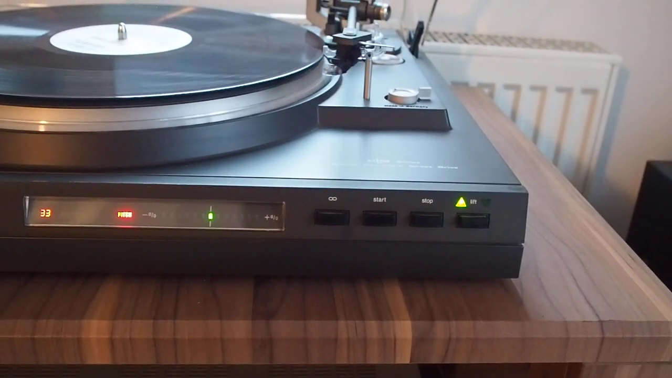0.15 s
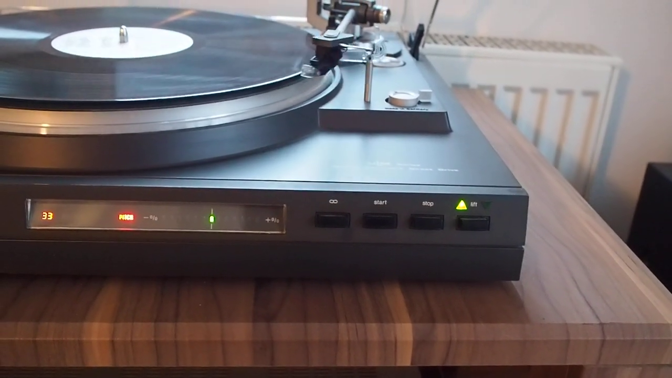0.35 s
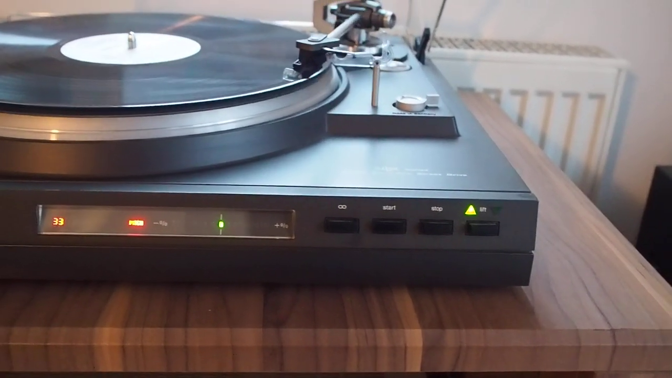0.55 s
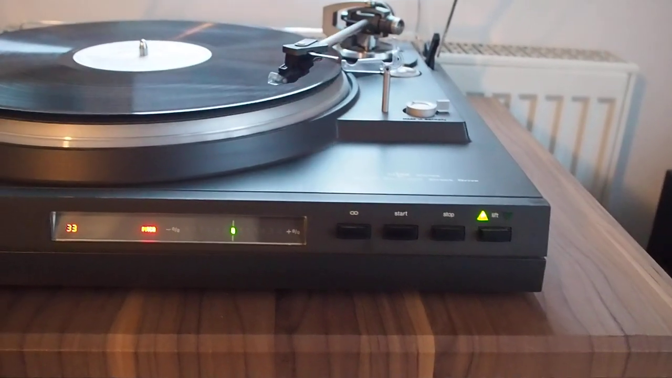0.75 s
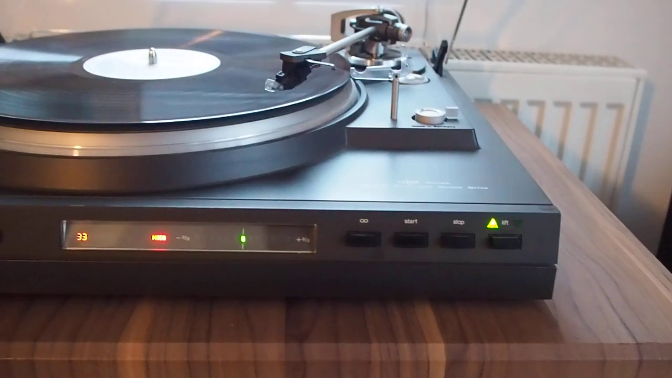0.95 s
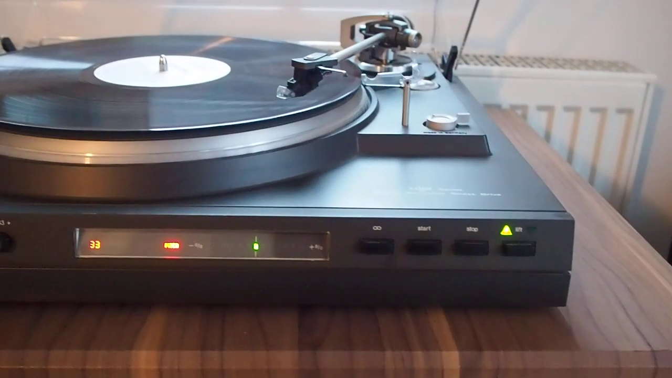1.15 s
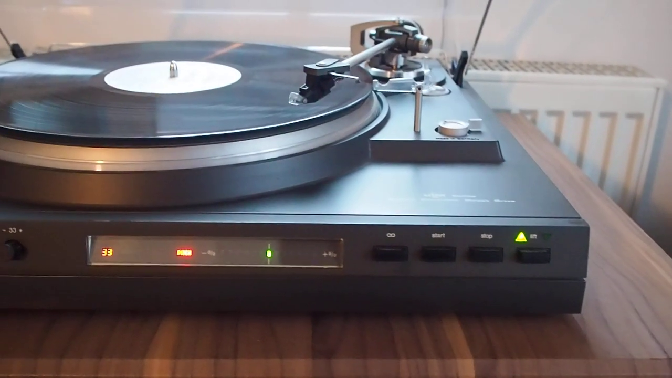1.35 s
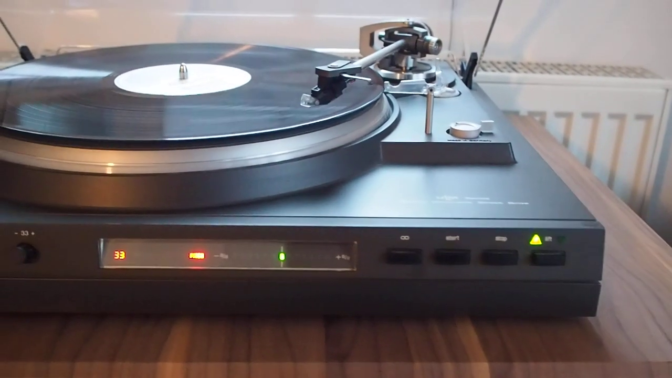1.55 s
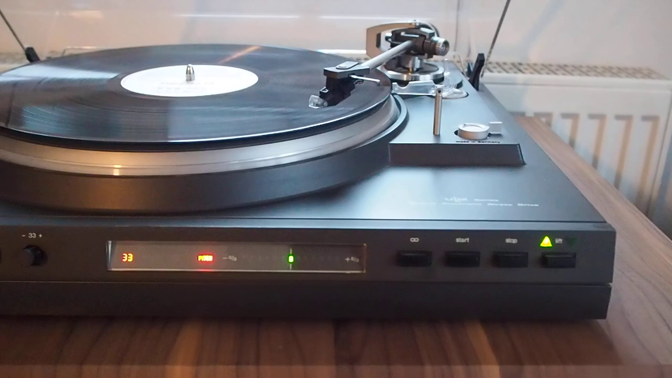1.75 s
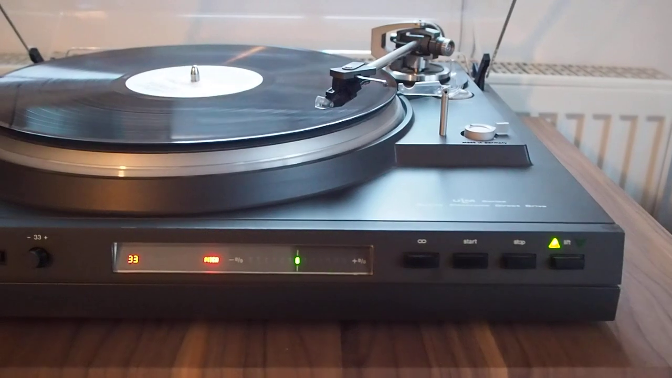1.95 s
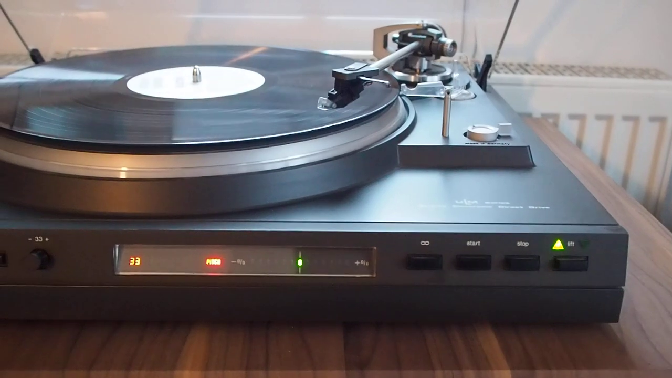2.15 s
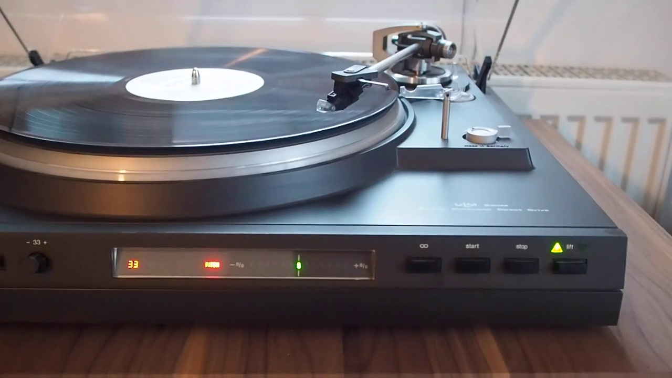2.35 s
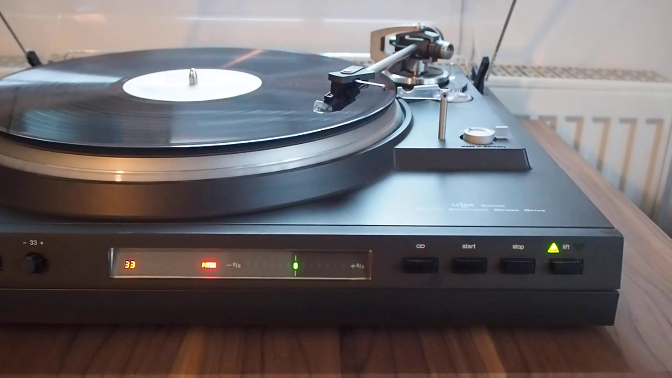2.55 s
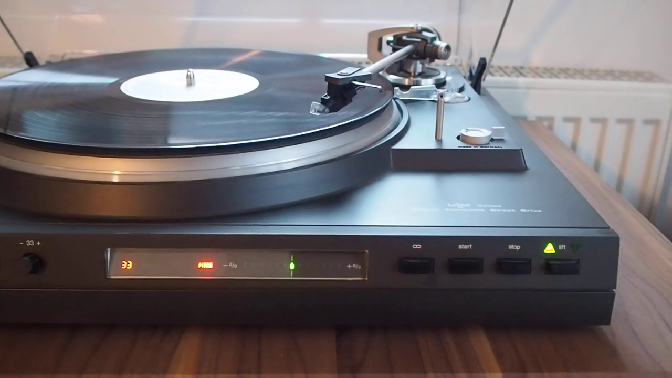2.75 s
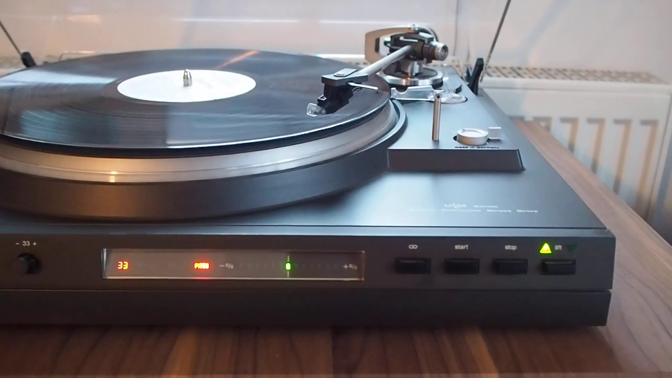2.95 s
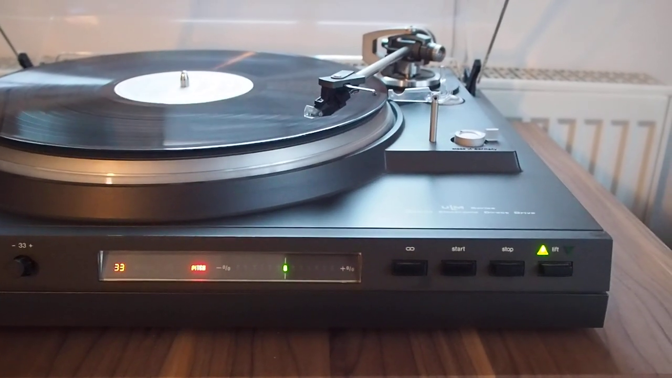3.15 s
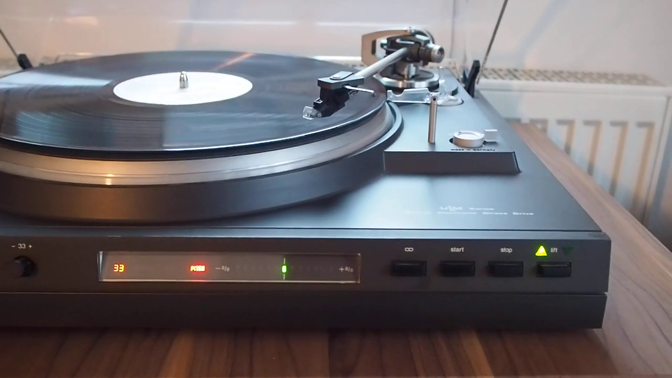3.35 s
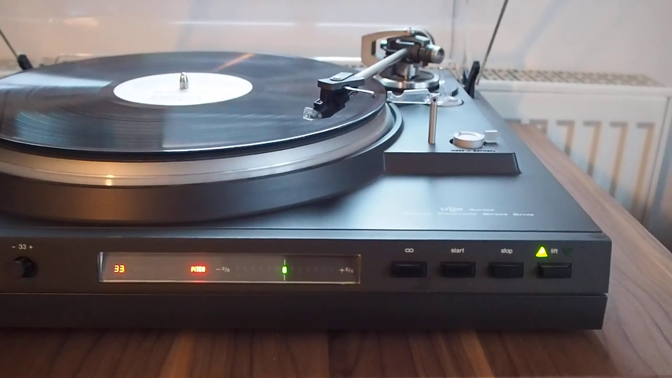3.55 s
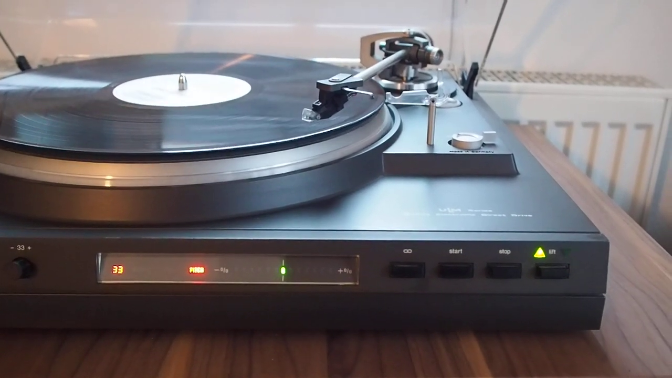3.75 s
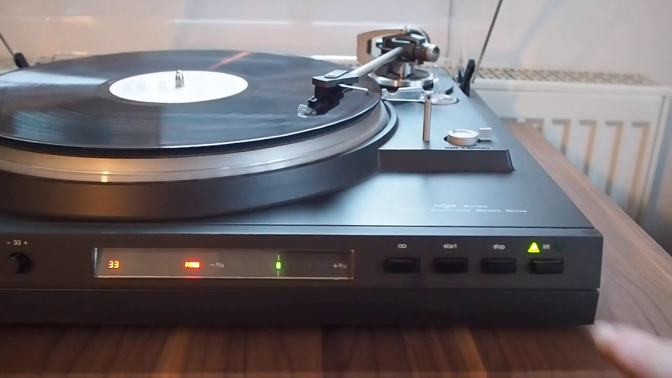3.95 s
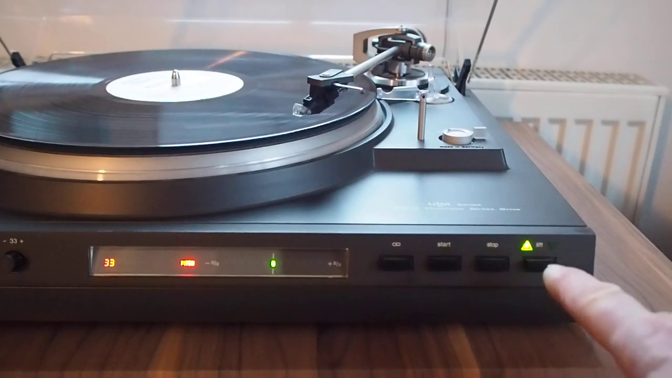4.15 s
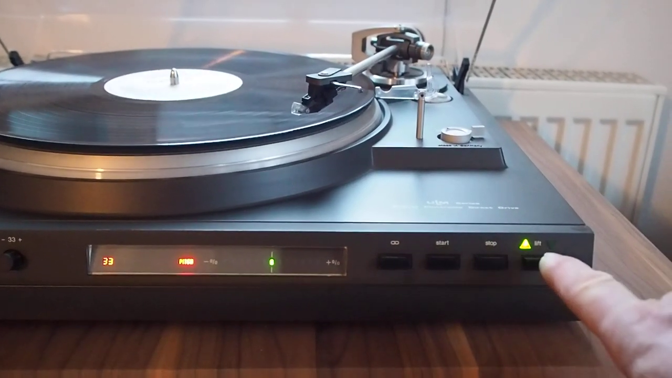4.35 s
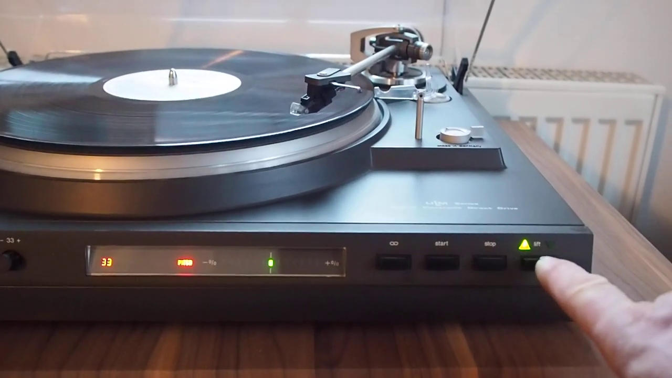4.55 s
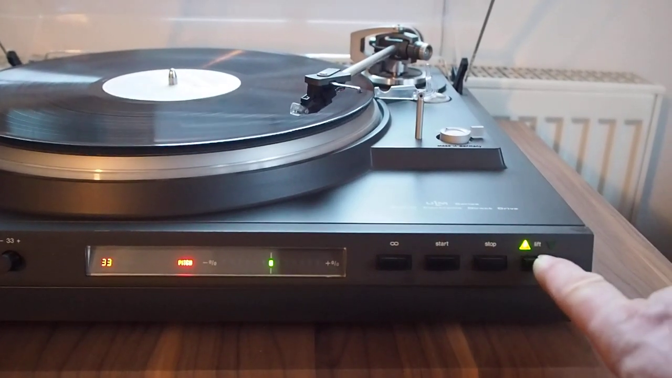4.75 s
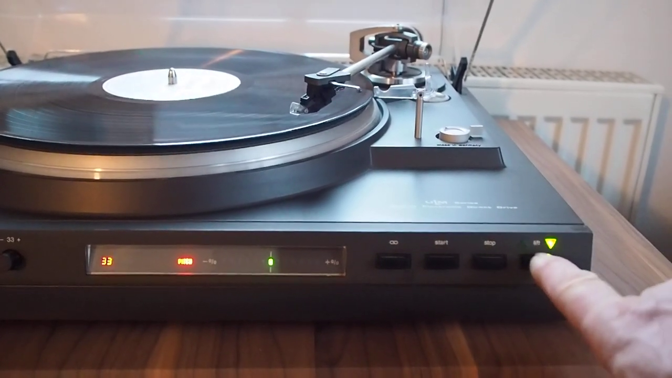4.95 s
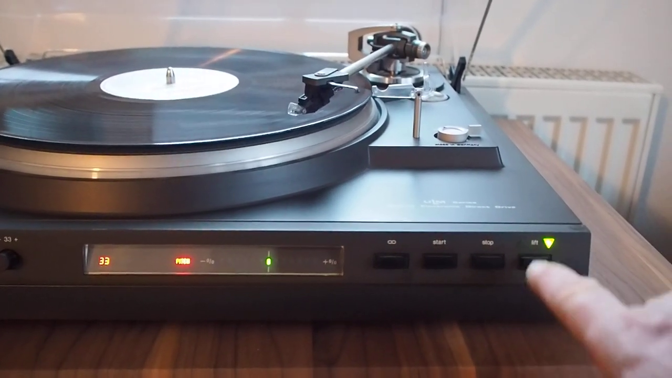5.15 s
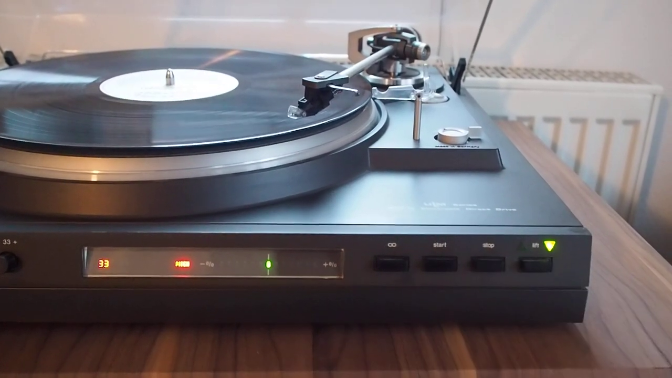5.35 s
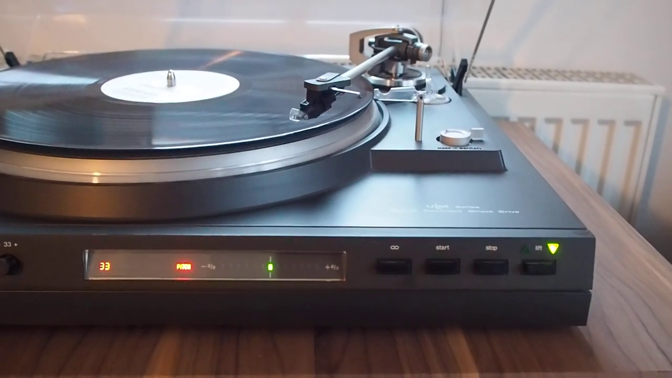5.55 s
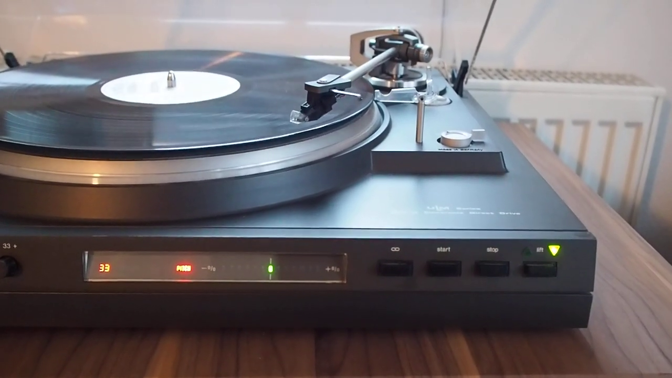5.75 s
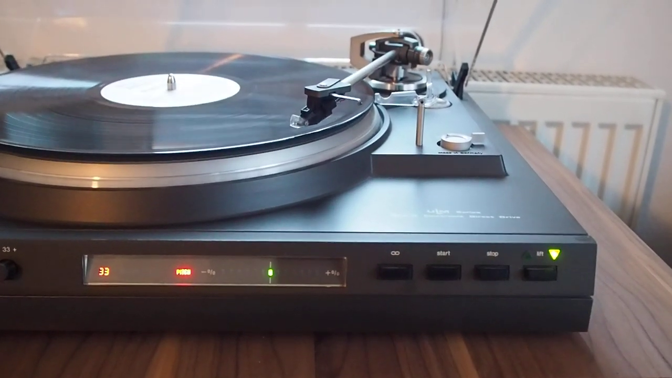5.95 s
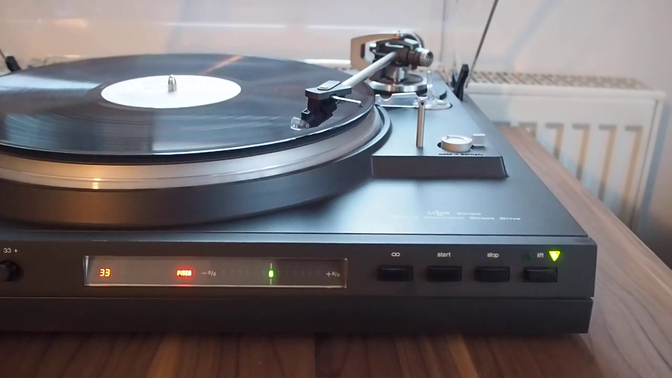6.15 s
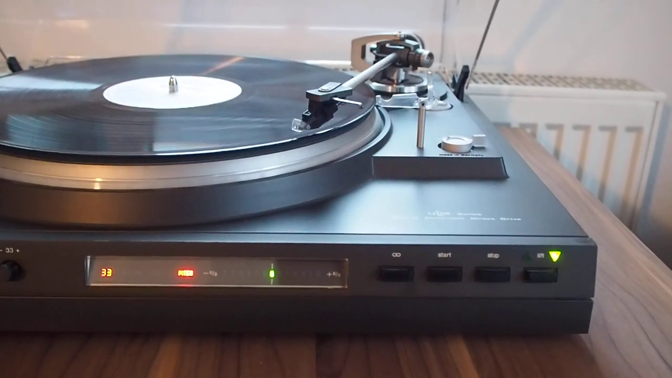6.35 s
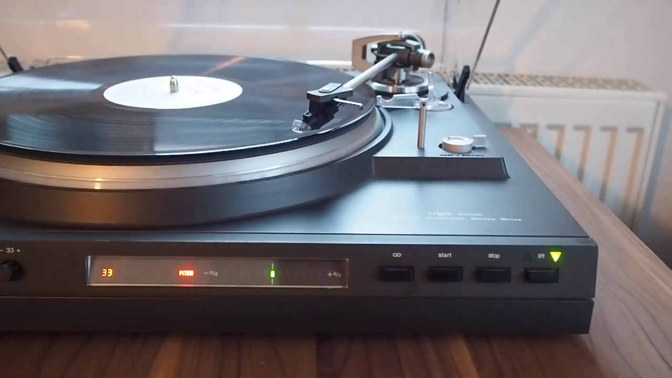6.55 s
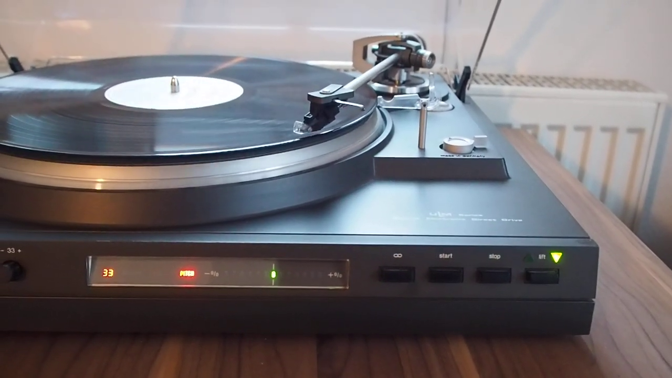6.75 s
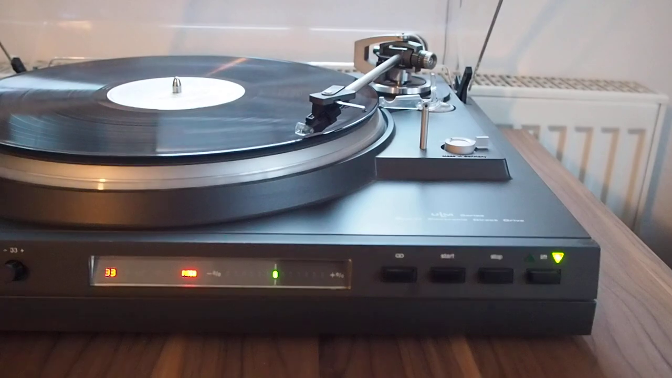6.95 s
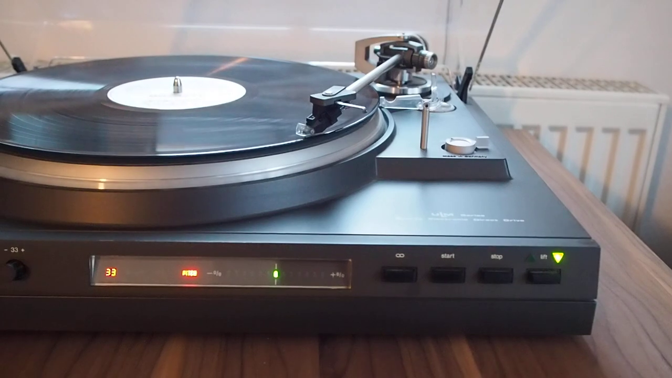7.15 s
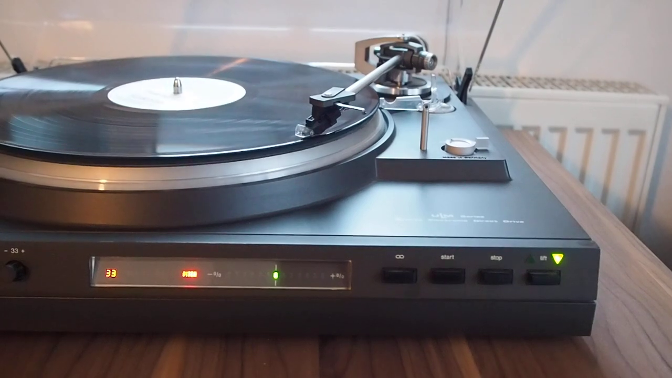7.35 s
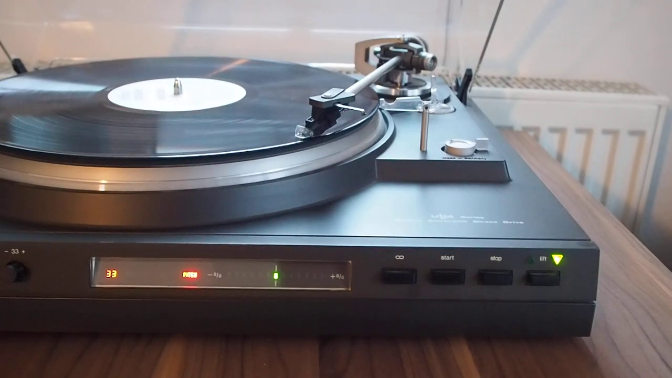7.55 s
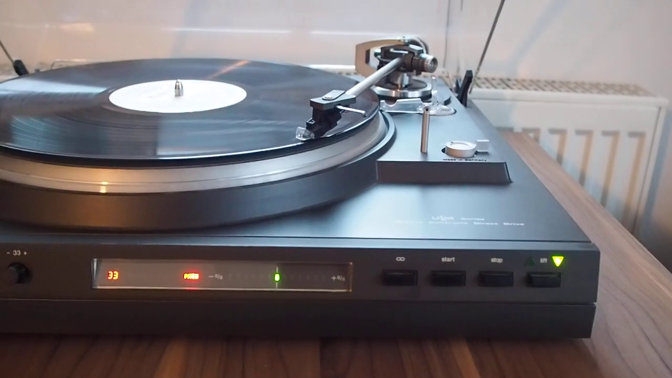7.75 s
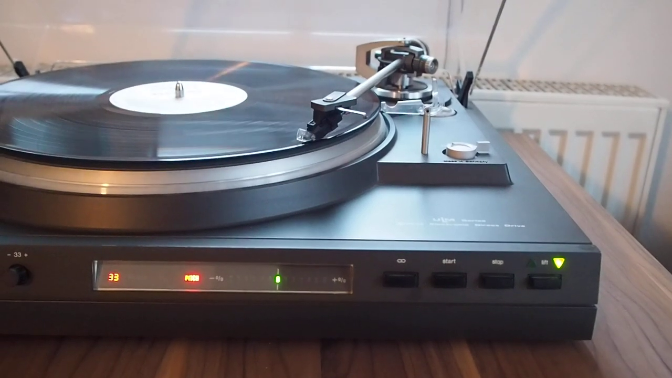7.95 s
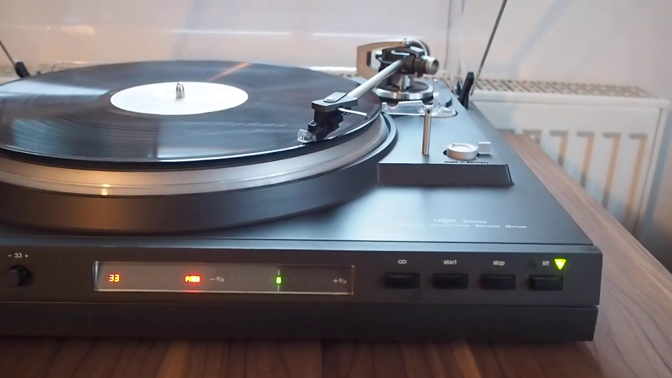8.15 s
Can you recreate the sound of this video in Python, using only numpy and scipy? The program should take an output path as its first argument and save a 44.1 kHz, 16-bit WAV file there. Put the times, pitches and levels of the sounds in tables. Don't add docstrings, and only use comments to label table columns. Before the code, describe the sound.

In a quiet room, a record player's arm mechanism snaps and clatters, a button clicks down and up, then the stylus lands with a thump.

```python
import sys
import numpy as np
from scipy import signal
from scipy.fft import rfft, irfft, next_fast_len
from scipy.io import wavfile
from scipy.ndimage import uniform_filter1d

SR = 44100
rng = np.random.default_rng(int(sys.argv[2]) if len(sys.argv) > 2 else 0)


def store_pcm(level_fs):
    pcm = np.round(np.clip(level_fs, -1, 1) * 32767).astype(np.int16)
    wavfile.write(sys.argv[1], SR, np.atleast_2d(pcm).T)


def rack_gain(trim_db):
    fader = np.asarray(trim_db, float)
    return 10 ** (fader / 20)


N = 361459
BASS_HZ, EDGE_HZ = 52.6, 15750
PLINTH_HZ = (180, 1500)
SHARP_HZ, CRISP_HZ, BLUNT_HZ = 14300, 12000, 6000
SIDEWAYS = 3.5


def evened(x):
    return x / np.sqrt(np.mean(x ** 2) + 1e-20)


def topped(x):
    return x / (np.max(abs(x)) + 1e-20)


def read(points, hz):
    f, value = np.transpose(points)
    return np.interp(np.log(hz + 1), np.log(f + 1), value)


def add(mix, s, sound):
    part = mix[..., round(s * SR):][..., :sound.shape[-1]]
    part += sound[..., :part.shape[-1]]


def sides(pan_db):
    return rack_gain(np.array([[.5], [-.5]]) * pan_db)


def chatter(lasts, rise):
    t = np.arange(4096) / SR
    shape = (1 - np.exp(-t / rise)) ** 2 * np.exp(-(t / (1.64 * lasts)) ** 1.225)
    uneven = rack_gain(2.65 * rng.exponential(1, 4096).clip(0, 4))
    blows = shape * rng.standard_normal(4096) * uneven
    for _ in range(2):
        z = rfft(blows)
        flat = irfft(z / (abs(z) + 1e-12)) * np.linalg.norm(shape)
        blows = np.clip(flat, -5 * shape, 5 * shape)
    return blows


def ring(body, crack_db, spread_db):
    t = np.arange(4096) / SR
    hz, width, db = np.transpose(body)[:, :, None]
    luck = rng.standard_normal((3, len(body), 1))
    db = db + spread_db * (luck[:1] + 0.83 * luck[1:])
    apart = np.array([[[.35]], [[-.35]]]) * (1 + 0.43 * luck[:1])
    phase = np.minimum(hz / 9000, 1) * np.pi * apart
    decay = 2 * np.pi * width / SR * np.exp(-np.pi * width * t)
    modes = rack_gain(db) * decay * np.sin(2 * np.pi * hz * t + phase)
    out = modes[:, ::2].sum(1) - modes[:, 1::2].sum(1)
    out[:, 0] += rack_gain(crack_db)
    return out


def band(x, hz):
    return signal.sosfilt(signal.butter(2, hz, "bandpass", fs=SR, output="sos"), x)


def click(row, body, plinth, crack_db, pan_db, top_hz, blur):
    s, db, plinth_db, ms, rise_ms = row
    lasts, rise = max(ms, .3) / 1000, max(rise_ms, .1) / 1000
    part_ring = ring(np.multiply(body, [1, blur, 1]), crack_db, spread_db=3.5)
    part = signal.fftconvolve(part_ring, chatter(lasts, rise)[None], axes=1)
    low_ring = ring(np.multiply(plinth, [1, np.sqrt(blur), 1]), -41.0, spread_db=1.05)
    low = signal.fftconvolve(low_ring, chatter(1.24 * lasts, rise)[None], axes=1)
    low = band(low, PLINTH_HZ)
    part = band(part, (PLINTH_HZ[1], top_hz))
    return s, sides(pan_db) * rack_gain(db) * (rack_gain(plinth_db) * topped(low) + topped(part))


def clicks(blur, *parts):
    out = np.zeros((2, N))
    for rows, *part in parts:
        for row in rows:
            add(out, *click(row, *part, blur))
    return out


# start_s, level_db, plinth_re_level_db, chatter_ms, rise_ms
LEVER_CLICKS = [
    (2.168, -45, 11.5, 2.2, .5),
    (2.255, -42, 3.5, 2.3, 0.62),
    (2.592, -48, 11, 2.5, .5),
    (2.972, -47.5, 8, 14, 0.5),
]
LATCH_CLICKS = [
    (2.6112, -5, -17, 2.86, 2.9),
]
TICK_CLICKS = [
    (.897, -42.5, -21, 2.9, 0.93),
    (.918, -42.5, -11, 2.6, .66),
]
PAWL_CLICKS = [
    (2.717, -21.5, -23, 2.2, 0.88),
]
CAM_CLICKS = [
    (2.945, -21.5, -16.5, 3.7, 0.78),
]
# pitch_hz, width_hz, level_db
LEVER_MODES = [(1920, 340, 2.5), (2880, 380, -6), (4230, 400, -6), (7500, 800, -10)]
LATCH_MODES = [(2210, 160, -27), (3370, 190, -30), (4200, 150, 4.5), (4870, 210, -7.5), (6770, 350, -8.5),
               (8500, 200, -10), (9650, 230, -8), (12250, 650, 0.5), (13200, 260, -2.5), (14200, 300, -14)]
PAWL_MODES = [(1960, 91, 8), (3030, 43, 3.5), (4650, 67, 10.2), (6470, 580, 3), (9300, 300, 7),
              (11500, 600, -5)]
CAM_MODES = [(1930, 120, -6), (3110, 77, 4.5), (4660, 570, -1.5), (8760, 320, -2), (12500, 250, 4.5)]
ARM_PLINTH = [(250, 24, 0), (410, 53, -11), (516, 57, -1.5), (716, 103, -0.5), (1000, 22, 8.5),
              (1147, 58, 0.5)]


def arm_linkage(blur):
    return clicks(blur, (LEVER_CLICKS, LEVER_MODES, ARM_PLINTH, -14, 2.2, BLUNT_HZ),
                  (LATCH_CLICKS, LATCH_MODES, ARM_PLINTH, -14, 2.5, SHARP_HZ),
                  (TICK_CLICKS, SWITCH_MODES, ARM_PLINTH, -8, 1.5, CRISP_HZ),
                  (PAWL_CLICKS, PAWL_MODES, ARM_PLINTH, -10, 1.5, CRISP_HZ),
                  (CAM_CLICKS, CAM_MODES, ARM_PLINTH, -12, 1.5, CRISP_HZ))


# start_s, level_db, plinth_re_level_db, chatter_ms, rise_ms
STOP_CLICKS = [
    (3.015, -23, -6.5, 5.1, 1.14),
    (3.282, -32.5, -9, 5, 0.83),
]
CATCH_CLICKS = [
    (3.061, -24.5, -20, 3.8, 1.9),
    (3.066, -15.5, -21.5, 3.9, 1.4),
]
# pitch_hz, width_hz, level_db
STOP_MODES = [(1900, 320, 5.5), (2800, 130, 17), (4220, 1300, 8), (5750, 1700, 5.5), (7800, 1500, -12),
              (11400, 980, -21)]
CATCH_MODES = [(2930, 150, -2), (4040, 130, -6), (4840, 310, 0), (6100, 390, 1), (7370, 480, -1),
               (8500, 170, 8.5), (8940, 340, 3), (10850, 530, -2.5), (13000, 700, -20)]
CAM_PLINTH = [(248, 18, 2.5), (460, 36, 1.5), (634, 280, -12), (970, 52, -2), (1146, 42, -5.5)]


def cam_stops(blur):
    return clicks(blur, (STOP_CLICKS, STOP_MODES, CAM_PLINTH, -13, 1.5, CRISP_HZ),
                  (CATCH_CLICKS, CATCH_MODES, CAM_PLINTH, -17, 1.2, CRISP_HZ))


# start_s, level_db, plinth_re_level_db, chatter_ms, rise_ms
SWITCH_CLICKS = [
    (4.926, -21.5, -18, 8.6, 0.15),
    (5.1272, -17.5, -26.5, 3.4, 0.18),
]
PRESS_CLICKS = [
    (4.931, -19.5, -25, 4.2, 1.6),
    (4.945, -6, -18.5, 3.6, 3.64),
]
RELEASE_CLICKS = [
    (5.177, -16, -27, 8.2, .6),
    (5.180, -15, -21.5, 3.7, 2.2),
]
# pitch_hz, width_hz, level_db
SWITCH_MODES = [(1930, 140, 8.5), (2320, 100, 12), (2880, 600, 4.5), (4160, 280, 10.5), (6320, 770, 2),
                (8200, 360, 1), (13000, 640, -40)]
PRESS_MODES = [(1880, 46, 9.5), (2170, 160, 3), (3350, 780, -9), (4380, 73, -2), (5000, 280, -7),
               (5540, 170, -2), (7740, 600, -14), (8800, 340, -10), (11700, 380, -5), (13360, 1000, -5.5)]
RELEASE_MODES = [(1957, 59, 1), (2750, 150, -1), (3520, 190, -8), (4630, 90, -3), (5240, 340, 1),
                 (5640, 65, 8), (8100, 260, -1), (8540, 200, -19), (11570, 510, 0), (14200, 600, -14)]
FRONT_PLINTH = [(238, 47, -5.5), (342, 130, -12), (472, 40, 5), (528, 63, -0.5), (710, 110, -4),
                (1050, 68, -5.5)]


def button(blur):
    return clicks(blur, (SWITCH_CLICKS, SWITCH_MODES, FRONT_PLINTH, -13, .8, CRISP_HZ),
                  (PRESS_CLICKS, PRESS_MODES, FRONT_PLINTH, -12, .8, CRISP_HZ),
                  (RELEASE_CLICKS, RELEASE_MODES, FRONT_PLINTH, -11, .8, CRISP_HZ))


def mechanism(blur):
    return rack_gain(5.5) * (arm_linkage(blur) + cam_stops(blur) + button(blur))


# start_s, level_db, plinth_re_level_db, chatter_ms, rise_ms
KNOCKS = [
    (3.974, -49, 12.5, 2.8, 0.23),
    (4.003, -45.5, -2, 4.1, 1.6),
    (6.461, -51.5, 14, 3, 0.13),
    (6.49, -49.5, 3, 5.7, 2.6),
    (7.391, -20, 2.5, 10.3, 0.12),
    (7.417, -19, -15.5, 10, 1.6),
    (7.44, -26, -4.5, 19.8, 3.3),
]
# pitch_hz, width_hz, level_db
KNOCK_MODES = [(1950, 280, -7), (2960, 390, -3.5), (4760, 3000, -6.5), (8100, 2600, -11.5)]
BOX_MODES = [(275, 82, 5.5), (440, 63, 3), (529, 43, 3.5), (703, 61, 3.5), (713, 140, -7), (868, 35, -1.5),
             (1057, 19, 7.5), (1464, 47, 1)]


def knocks(blur):
    return clicks(blur, (KNOCKS, KNOCK_MODES, BOX_MODES, -30, 1.5, BLUNT_HZ))


# start_s, level_db, push_ms
THUMPS_PUSHED = [
    (3.014, -68, 1.1),
    (3.072, -57, 1.1),
    (3.9768, -23.5, 3),
    (4.9297, -25, 3.4),
    (5.173, -59, 1.5),
    (6.4644, -25.5, 2),
    (7.183, -33, 2.5),
    (7.3956, -11, 1.6),
]
# pitch_hz, level_db, t60_s
LOW_MODES = [(66, -24, 0.2), (80.2, 0.5, 0.17), (89.6, 6, 0.17), (106, -4.5, 0.29), (124, -7, 0.35),
             (164.7, 0.5, 0.4), (194.2, -1.5, 0.25), (259.7, -7, 0.16)]
# start_s, level_db, width_ms
STYLUS_POP = (7.392, -6.5, 0.46)


def thumps():
    out, t = np.zeros(N), np.arange(SR // 2) / SR
    hz, db, t60 = np.transpose(LOW_MODES)[:, :, None]
    swell = 1 - np.exp(-t / 0.0053)
    for s, level_db, ms in THUMPS_PUSHED:
        luck = rng.standard_normal((2, len(LOW_MODES), 1))
        decay = rack_gain(db + 1.03 * luck[0] - 60 * t / t60)
        modes = (decay * np.sin(2 * np.pi * hz * (1 + 0.008 * luck[1]) * t)).sum(0)
        push = t[:2000] * np.exp(-t[:2000] * 1000 / ms * 2)
        boom = signal.fftconvolve(modes * swell, push)[:len(t)]
        add(out, s, -rack_gain(level_db) * topped(boom))
    s, level_db, ms = STYLUS_POP
    u = (t[:400] - .003) * 1000 / ms
    add(out, s - .003, -rack_gain(level_db) * (1 - 2 * u ** 2) * np.exp(-u ** 2))
    out = signal.sosfilt(signal.butter(3, BASS_HZ, "highpass", fs=SR, output="sos"), out)
    return out * sides(1.5)


# pitch_hz, correlation
LIKENESS = [(60, 0.41), (130, 0.7), (290, 0.5), (640, 0.59), (1410, -0.025), (3100, 0.057), (6820, -0.11),
            (15000, 0.014)]


def noise(gain, patchy_db):
    frames, hz = N // 512 + 5, np.fft.rfftfreq(2048, 1 / SR)
    a, b, c, d, patches = rng.standard_normal((frames, 1025, 5)).T
    patches = evened(uniform_filter1d(uniform_filter1d(patches, 12, 0), 8, 1))
    same = np.clip(read(LIKENESS, hz), -1, 1)[:, None]
    left = a + 1j * b
    right = same * left + np.sqrt(1 - same ** 2) * (c + 1j * d)
    z = np.array([left, right]) * gain(hz)[:, None] * rack_gain(patchy_db * patches)
    return evened(signal.istft(z, nperseg=2048, noverlap=1536)[1][:, :N])


# loudest_s, level_db, swell_s, fade_s
RUSTLE_SWEEPS = [
    (4.0, -49, 0.06, .12),
    (6.467, -51, 0.012, 0.25),
    (7.19, -51.5, .012, 0.5),
    (7.355, -51.5, 0.051, 0.11),
    (7.796, -56.5, 0.2, 0.035),
    (7.866, -52, 0.093, 0.097),
    (8.048, -49, 0.055, 0.13),
]
# pitch_hz, level_db
RUSTLE_SPECTRUM = [(500, 4), (1500, -0.5), (3000, 5.5), (6000, 4.5), (10000, -6.5), (16000, -22)]


def rustle():
    t, level = np.arange(N) / SR, np.zeros(N)
    for s, db, swell, fade in RUSTLE_SWEEPS:
        away = np.maximum((s - t) / swell, (t - s) / fade)
        level += rack_gain(db - 20 * np.minimum(away, 5))
    clumps = rack_gain(2.0 * evened(uniform_filter1d(rng.standard_normal(N), 300)))
    hiss = noise(lambda hz: rack_gain(read(RUSTLE_SPECTRUM, hz)), patchy_db=1.5)
    return level * evened(clumps * hiss)


# delay_s, level_db
EARLY_ECHOES = [(.004, -9), (.0075, -7.5), (.015, -16.5), (0.02, -19), (.038, -25)]
# pitch_hz, t60_s
REVERB_TIMES = [(60, 0.33), (200, 0.47), (500, 0.53), (1200, 0.5), (3000, 0.5), (8000, 0.36), (16000, 0.3)]


def room(x, wet_db, echo_db):
    taps = np.zeros((2, SR))
    at = np.arange(300, SR - 20, 20) + rng.integers(0, 20, (2, (SR - 301) // 20))
    np.put_along_axis(taps, at, rng.choice([-1., 1.], at.shape), 1)
    hz, t, z = signal.stft(taps, SR, nperseg=512)
    apart = np.clip(hz / 1500, 0, 1)[:, None] ** 1.2
    z = np.array([z[0], np.sqrt(1 - apart ** 2) * z[0] + apart * z[1]])
    decay = rack_gain(-60 * t / read(REVERB_TIMES, hz)[:, None])
    tail = signal.istft(z * decay, SR, nperseg=512)[1]
    tail = tail + 0.54 * tail[::-1]
    tail = signal.sosfilt(signal.butter(2, BASS_HZ, "highpass", fs=SR, output="sos"), tail)
    tail *= rack_gain(wet_db) / np.linalg.norm(tail[0])
    for s, db in EARLY_ECHOES:
        tail[0, round(s * SR)] += rack_gain(db + echo_db)
        tail[1, round(s * SR * 1.03)] += rack_gain(db + echo_db)
    return signal.fftconvolve(x, tail, axes=1)[:, :N]


# pitch_hz, level_db (per Hz)
MURMUR_SPECTRUM = [(27, -24), (40, 1), (170, -7.5), (320, -10.5), (1150, -12.5), (1650, -22.5), (2200, -20),
                   (5000, -110)]
# pitch_hz, width_hz, level_db
AIR_HUMS = [(211, 103, -57.5), (559.5, 113, -57.5), (962, 45, -69)]
# pitch_hz, level_db (per Hz)
HISS_SPECTRUM = [(1000, -4), (2000, -1), (5500, 0), (8000, -5.5), (12000, -10.5), (16000, -12.5)]


def floor():
    murmur = rack_gain(-50 - 3.5) * noise(lambda hz: rack_gain(read(MURMUR_SPECTRUM, hz)), patchy_db=2.5)
    hums = np.zeros((2, N))
    for f, w, db in AIR_HUMS:
        hums += rack_gain(db) * noise(lambda hz: 1 / (1 + (2 * (hz - f) / w) ** 2), patchy_db=0.4)
    hiss = rack_gain(-56.5) * noise(lambda hz: rack_gain(read(HISS_SPECTRUM, hz)), patchy_db=1.1)
    return sides(2.4) * (murmur + hums) + sides(1.7) * hiss


def scene():
    near, far, boom = mechanism(0.77), knocks(1), thumps()
    near_room = room(mechanism(SIDEWAYS), -12.0, -7.5)
    far_room = room(knocks(SIDEWAYS) + rack_gain(-6.5) * boom, -2.5, 1)
    return near + near_room + far + far_room + boom + rustle() + floor()


def roll_off(x):
    return signal.sosfilt(signal.butter(12, 16470, fs=SR, output="sos"), x)


# pitch_hz, width_hz, level_db
HOUSING_NOTCHES = [(6580, 610, -11), (10410, 910, -11)]


def record(dry):
    size = next_fast_len(N)
    hz = np.fft.rfftfreq(size, 1 / SR)
    colour_db = sum(db / (1 + (2 * (hz - f) / w) ** 2) for f, w, db in HOUSING_NOTCHES)
    colour_db += np.interp(hz, [EDGE_HZ, EDGE_HZ + 60, EDGE_HZ + 700], [0, -25, -45])
    mix = irfft(rfft(dry, size) * rack_gain(colour_db), size)[:, :N] - .0028
    return roll_off(mix)


dry = scene()
out = record(dry)
store_pcm(out)
```